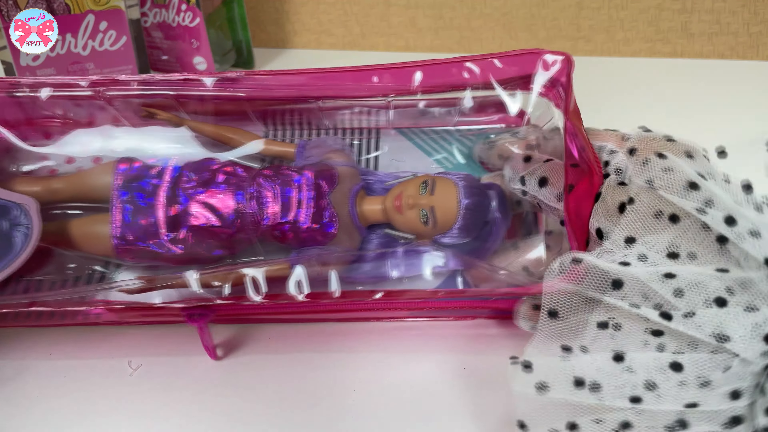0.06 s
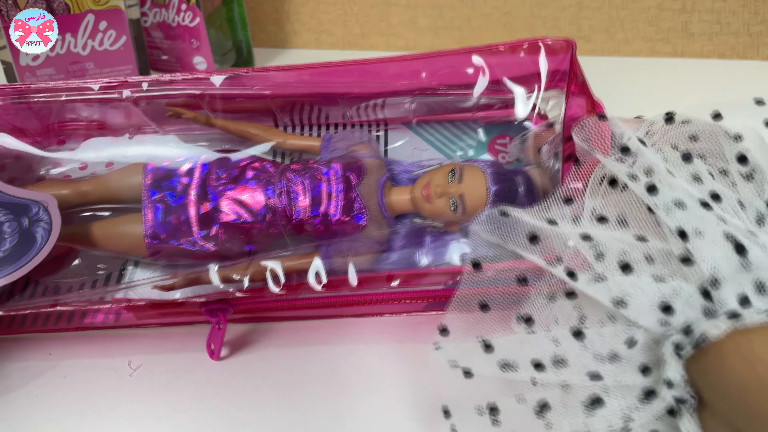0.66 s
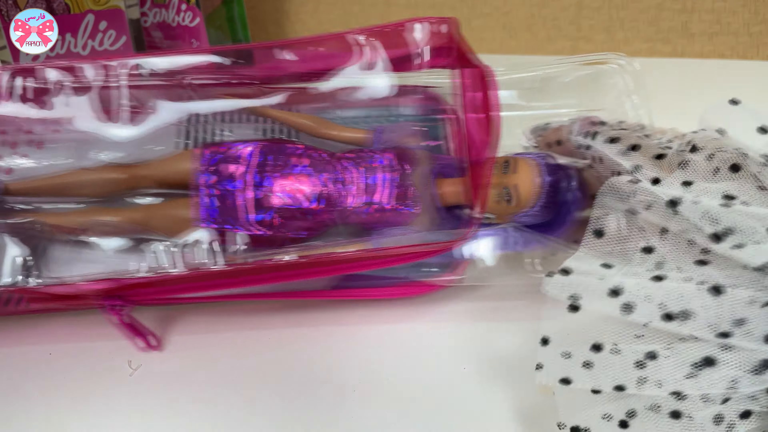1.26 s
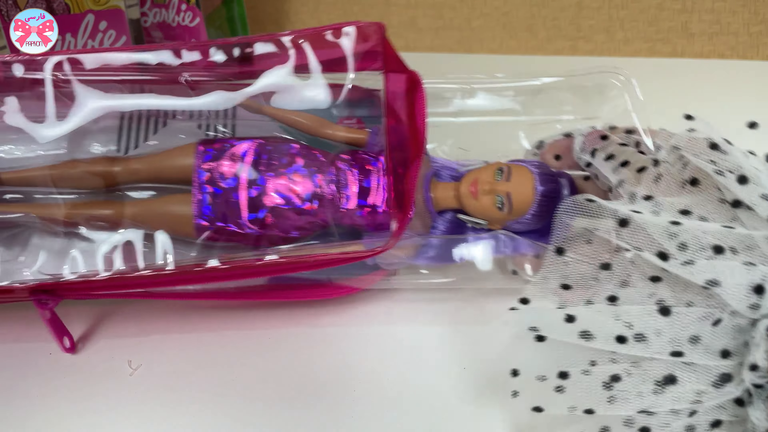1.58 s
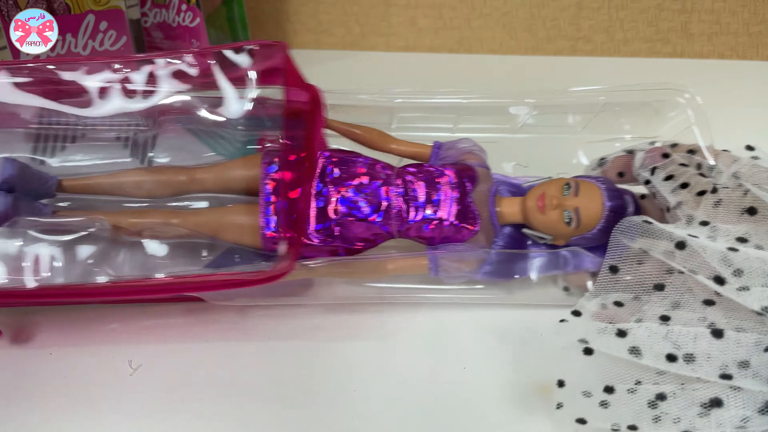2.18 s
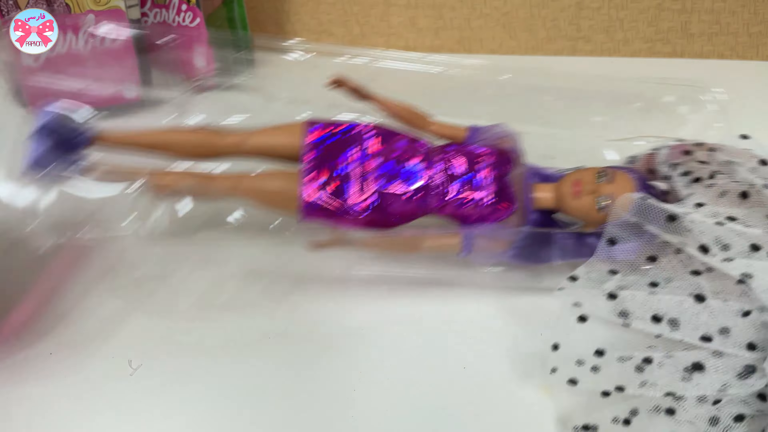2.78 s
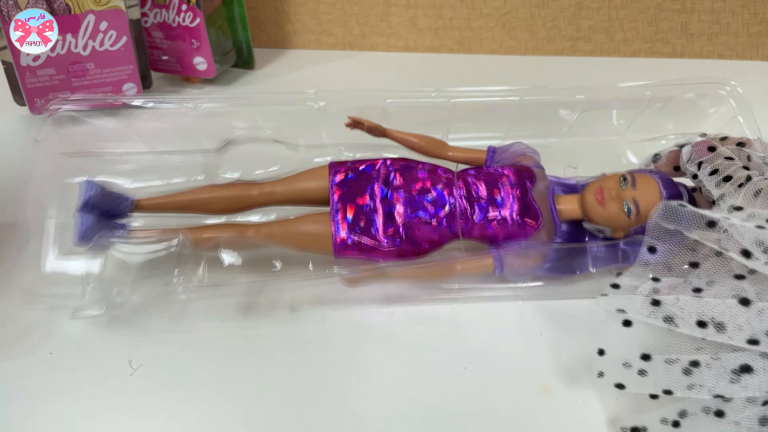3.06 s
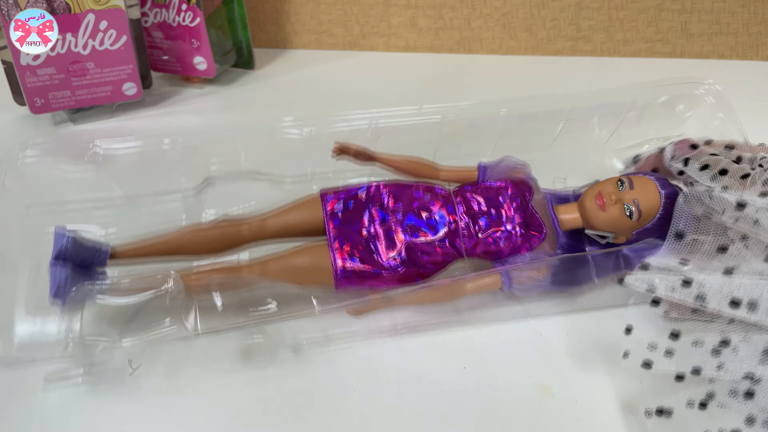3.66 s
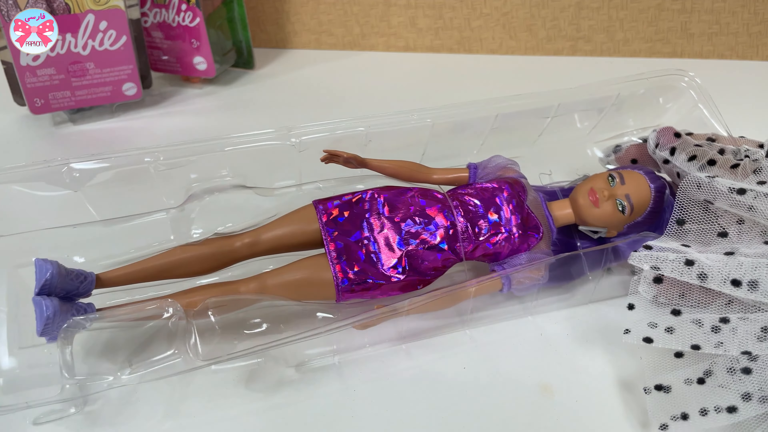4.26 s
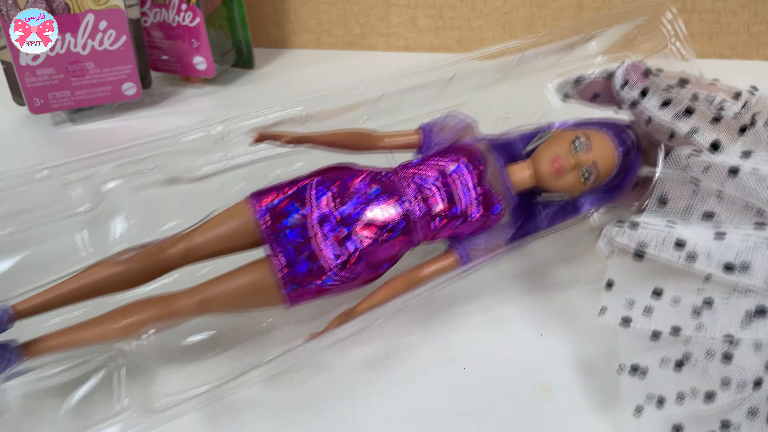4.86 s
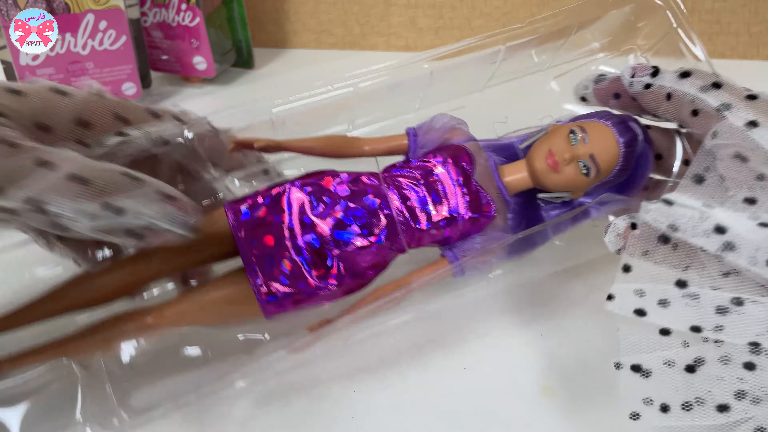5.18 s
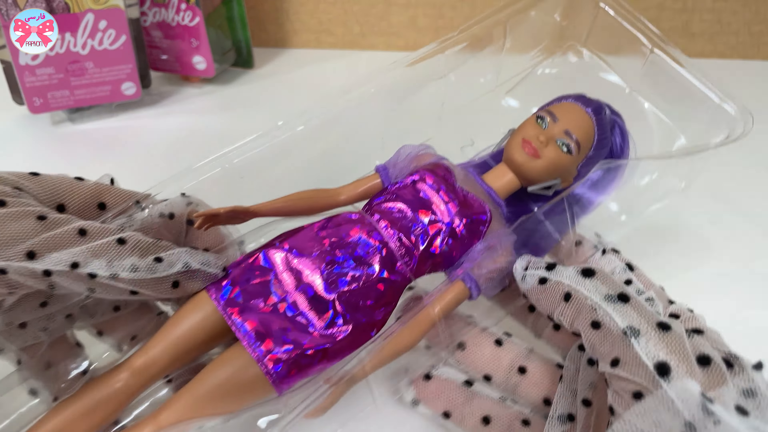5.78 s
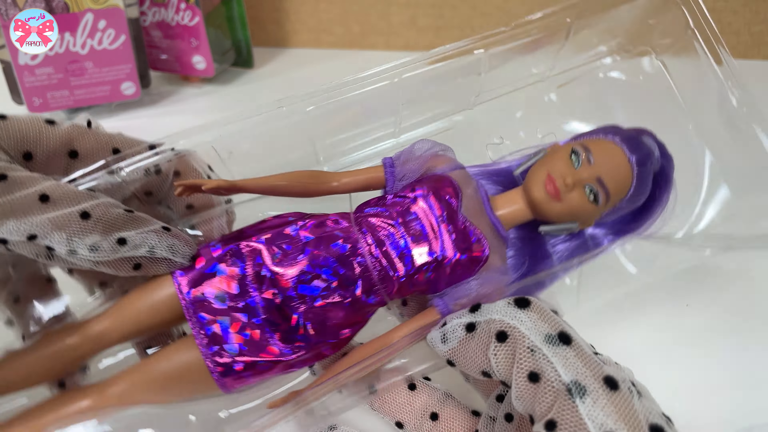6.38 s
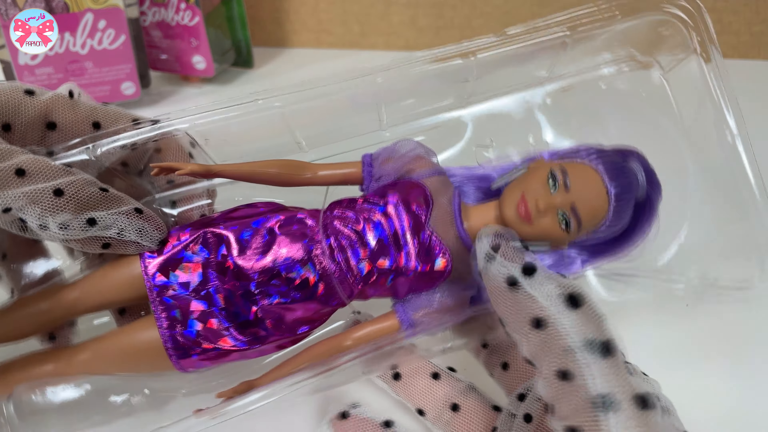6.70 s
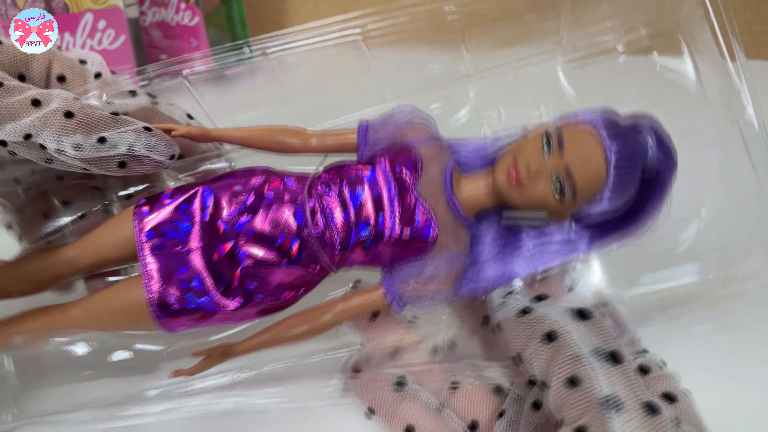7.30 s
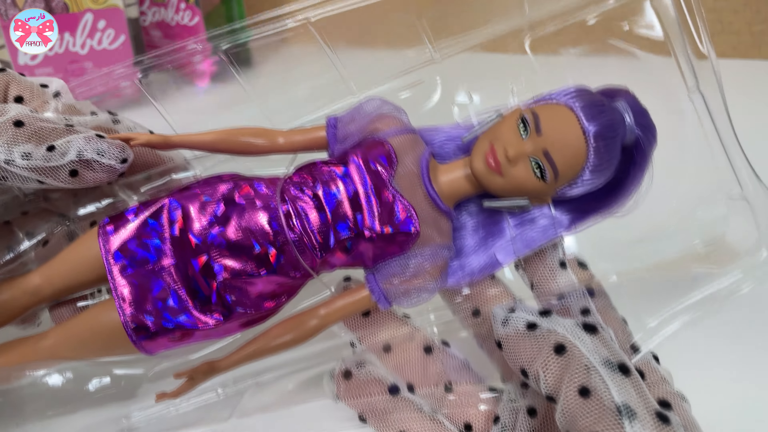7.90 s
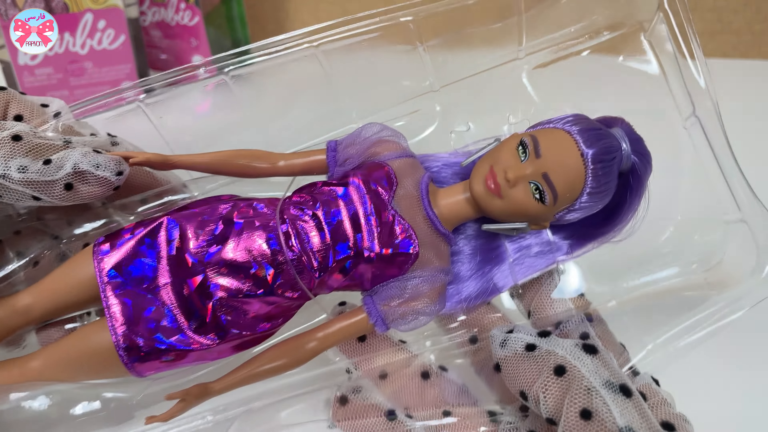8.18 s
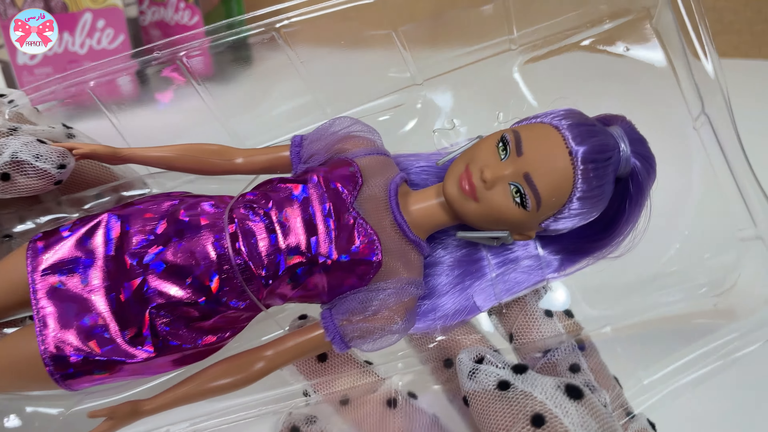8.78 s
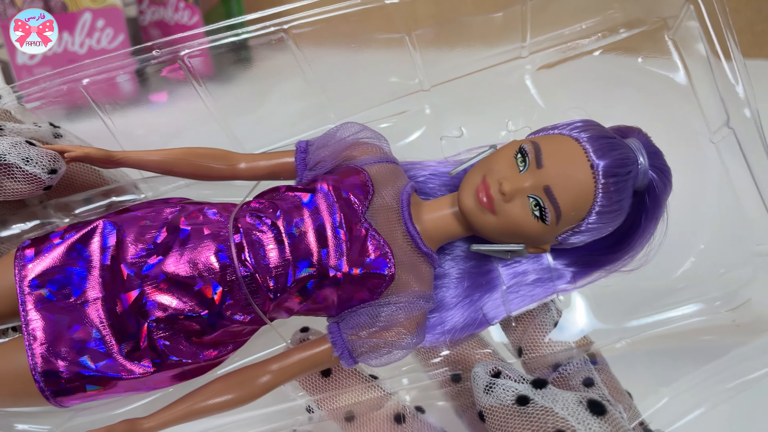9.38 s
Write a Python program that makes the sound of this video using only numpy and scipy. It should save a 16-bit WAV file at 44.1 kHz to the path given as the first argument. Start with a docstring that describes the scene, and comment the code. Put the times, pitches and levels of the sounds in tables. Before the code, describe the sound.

A thin plastic tray is tugged from a vinyl pouch and flexed, with close scrapes, crinkles, sharp snaps and a few dull table thumps.

```python
"""At a table in a small room, close by: a thin moulded plastic tray is tugged out of a vinyl pouch,
set down, turned and flexed open. Vinyl, table top and mesh sleeves scrape over it in tiny slips.
The sheet buckles in sharp snaps whose bending waves chirp downward and bounce between its edges.
Hard blows thump the table. The room answers over a low hum and rumble."""
import sys
import numpy as np
from scipy import signal
from scipy.fft import rfft, irfft, next_fast_len
from scipy.io import wavfile
from scipy.ndimage import uniform_filter1d, map_coordinates

SR = 44100
rng = np.random.default_rng(int(sys.argv[2]) if len(sys.argv) > 2 else 0)


def master(y):
    """Save y as 16-bit WAV."""
    cut = np.clip(np.atleast_2d(y).T, -1, 1)
    pcm = np.round(cut * 32767)  # scale
    wavfile.write(sys.argv[1], SR, pcm.astype(np.int16))


N = 420713
RING = 8192  # samples per impulse response
RING_HZ = np.fft.rfftfreq(RING, 1 / SR)
SNAP_SAMPLES = .01 * SR  # snap and tick levels are rms over this span

# room noise spectrum: f/Hz, relative level/dB
AIR_SPECTRUM = [(25, -45.5), (43, -27.5), (62, -5), (80, -7.5), (110, -7.5), (150, -20.5), (270, -13),
                (600, -29), (1100, -25.5), (1600, -36), (2300, -25.5), (3600, -32.5), (4500, -26.5),
                (6500, -46.5), (16000, -59)]
# rumble envelope: t/s, level/dB
RUMBLE_LEVELS = [(0, -58.5), (1.6, -60), (3.9, -59.5), (5.4, -64), (8.2, -61.5), (8.7, -70.5), (9.5, -57)]
# hum partials: f/Hz, level/dB
HUM_PARTIALS = [(62, -68), (120, -67)]
# pouch drags over tray: t/s, attack/s, hold/s, rub level before trim/dB, drumming re rub/dB,
# hiss re rub/dB, low note/Hz, high note/Hz
POUCH_STROKES = [(0.0, 0.01, 0.2, -47, -5, -6.0, 436, 1610.0),
                 (0.228, 0.015, 0.14, -50.5, -4.5, -1.5, 267, 1370.0),
                 (0.367, 0.14, 0.16, -49, -0.5, -11.5, 398, 1390.0),
                 (0.652, 0.22, 0.12, -39, -7.5, -15.5, 465, 1510.0),
                 (0.916, 0.082, 0.064, -28, -7, 0.0, 954, 5690.0),
                 (1.102, 0.02, 0.105, -49.5, -3, -8.0, 265.0, 1250.0),
                 (1.212, 0.11, 0.18, -52.0, -12.5, -24, 465, 1610.0),
                 (1.558, 0.034, 0.088, -30.5, -12.0, -7, 243, 1096),
                 (1.907, 0.017, 0.1, -34.0, -11, -1.5, 1020, 2810.0),
                 (2.041, 0.033, 0.046, -45.0, -16.5, -7.0, 200.0, 1370.0),
                 (2.204, 0.046, 0.071, -40.5, 1, 0.5, 450.0, 5750.0),
                 (2.3, 0.099, 0.1, -29.5, -16, 0.5, 686.0, 4610.0),
                 (2.495, 0.012, 0.11, -39.5, -6.0, 1.5, 700, 3980.0),
                 (2.674, 0.11, 0.02, -46, 3.5, 11.5, 470, 3820.0),
                 (2.749, 0.087, 0.014, -22.5, -13.5, 1.5, 710, 2150.0)]
# tray slides on table and under sleeves: columns as POUCH_STROKES
SLIDE_STROKES = [(3.114, 0.019, 0.0088, -37.5, 4, -8.5, 453, 1600),
                 (3.227, 0.137, 0.045, -49.5, 1.5, -7, 244, 1560),
                 (3.638, 0.057, 0.042, -38, 9, -8, 186.0, 452.0),
                 (3.774, 0.029, 0.032, -52.5, 11, -2.5, 186.0, 460.0),
                 (4.074, 0.01, 0.16, -59.5, -4.5, -8, 914, 4540),
                 (4.249, 0.027, 0.051, -48.5, -11, 0.0, 730, 3300.0),
                 (4.39, 0.076, 0.051, -56.5, 1, -3, 754.0, 2480.0),
                 (4.661, 0.07, 0.4, -67, -0.5, 7, 480, 8500),
                 (5.218, 0.067, 0.11, -30, -10, -1.5, 1620.0, 3300.0),
                 (5.393, 0.011, 0.25, -49.5, -9, -0.5, 1360, 3400),
                 (5.681, 0.14, 0.15, -56, 1, 5.5, 361, 1950),
                 (6.065, 0.099, 0.2, -47.5, -4.5, -1.0, 343, 3900.0),
                 (6.273, 0.18, 0.13, -34, -9, -11, 567.0, 1080.0),
                 (6.624, 0.12, 0.15, -49.0, 4, -4.0, 260.0, 944.0),
                 (6.896, 0.052, 0.19, -51.5, 0, 0.5, 490, 3900)]
# fingers shift, grip too tight to sing: columns as POUCH_STROKES, without notes
GRIP_STROKES = [(7.136, 0.017, 0.025, -51, -11, -7), (7.318, 0.048, 0.51, -59.5, 1.5, -1.5),
                (8.052, 0.07, 0.074, -62.5, -6.5, 0), (8.83, 0.13, 0.24, -69, -2, 6.5)]
# tray panel resonances: f/Hz, width/Hz, gain/dB
PANEL_MODES = [(155, 63, -4.5), (450, 40, 0.5), (727, 50, -0.5), (1070, 310, 1), (1420, 120, 0.5),
               (2150, 210, 0.5), (3160, 960, -2), (4300, 160, -1)]
# source spectra: f/Hz, relative level/dB
POUCH_SPECTRUM = [(41, -50), (70, -17.5), (385, -9.5), (620, -7.5), (744, -3.5), (815, -2), (977, -4),
                  (1850, -10), (2780, -8.5), (4190, -14), (5620, -14.5), (6750, -16.5), (12200, -26),
                  (16000, -34.5)]
TRAY_SPECTRUM = [(41, -27.5), (70, -14), (186, 0.5), (483, -5.5), (566, -6.5), (797, -4), (1100, -5),
                 (1370, -7.5), (1610, -7), (1980, -13.5), (2220, -12), (2780, -14.5), (7220, -24),
                 (16000, -41.5)]
SNAP_SPECTRUM = [(40, -35), (110, -13.5), (280, -6), (600, 2.5), (1100, 5.5), (1900, 2), (3200, 2.5),
                 (5500, -2.5), (8000, -8.5), (10500, -14), (13000, -22), (16000, -22)]
TICK_SPECTRUM = [(300, -20.5), (1200, -4), (4000, 4.5), (9000, -9), (16000, -14.5)]
RUMBLE_SPECTRUM = [(35, -38), (60, 2.5), (120, -1.5), (300, -15), (700, -47), (2000, -100)]
# room decay: f/Hz, t60/s
ROOM_T60 = [(150, 0.15), (1000, 0.25), (4000, 0.22), (9000, 0.23), (15000, 0.085)]
# buckles and knocks; soft knocks dark, small creases bright, broad panels focused in the middle:
# t/s, level before trim/dB, tilt/(dB/oct), focus/(dB/oct^2), crease run/s, panel note/Hz
BUCKLES = [(0.0649, -29.5, -1.5, -0.4, 0.0023, 1100), (0.107, -20.5, -8.5, 0.5, 0.0048, 836),
           (0.186, -39, -7, 3, 0.0028, 1220.0), (0.2046, -28.5, -2, 1, 0.0052, 1280),
           (0.2853, -11, -5.5, 1.5, 0.0018, 826), (0.367, -39, -1, 2.5, 0.008, 2800),
           (0.3757, -27.0, -0.5, -0.7, 0.00042, 2740), (0.6043, -20, -7.5, -1.1, 0.001, 814),
           (0.61, -24, -9, 4.5, 0.0041, 1066), (0.715, -39.5, -6.5, -0.7, 0.0065, 506.0),
           (0.853, -31.5, -16, 3.3, 0.0076, 499), (0.9324, -9.0, -0.5, 0.2, 0.0054, 1060.0),
           (0.978, -21.5, -3, -1.7, 0.0009, 1180.0), (0.983, -17, -5, -1.3, 0.0055, 1003),
           (1.0216, -19.5, 0, -1, 0.0011, 5840), (1.071, -23, -1.9, -1.5, 0.00063, 1040),
           (1.211, -26, -14, 1.5, 0.0059, 470), (1.528, -32.5, -11.5, 0.7, 0.0078, 474.0),
           (1.5784, -24.5, 0.5, -0.6, 0.0014, 1200), (1.613, -29, -0.5, 0.8, 0.0073, 1100),
           (1.727, -32.5, -8.5, -1.3, 0.0078, 710), (1.894, -29, -5.5, 2, 0.0051, 795),
           (1.98, -24.5, -7.5, 4, 0.0024, 1000), (2.1231, -27, -1.5, -1.8, 0.00047, 5100),
           (2.226, -30.5, -1.2, -1.8, 0.0011, 4200), (2.2821, -23, -2, -0.9, 0.0011, 5800.0),
           (2.3069, -27.0, -2, -2, 0.00054, 4260.0), (2.395, -18.5, -0.7, -0.2, 0.0038, 4130.0),
           (2.4297, -14, 4, 0.8, 0.0046, 4560), (2.444, -16.5, -1.7, -0.8, 0.0062, 723),
           (2.561, -25, -2.5, -1, 0.0098, 656), (2.576, -29, 4, 1, 0.0018, 3710),
           (2.592, -18.5, -0.9, -0.9, 0.0015, 2960), (2.62, -38, 6, -1, 0.00075, 2830),
           (2.674, -38.5, -0.5, -2, 0.0032, 1210.0), (2.771, -14.0, 3, -0.5, 0.00072, 2670),
           (2.8209, -15.5, 2.2, 1, 0.0055, 3400), (2.85, -15.5, 2, 4.5, 0.00063, 2150.0),
           (3.1241, -20, -2.6, 0, 0.0026, 1460), (3.131, -21, -7.5, -1.9, 0.003, 503),
           (3.265, -36.5, -4, -0.1, 0.0027, 480), (3.647, -31, -7.5, -0.2, 0.0045, 450.0),
           (3.687, -27.5, -6.1, -1.5, 0.00097, 452.0), (3.708, -22, -5, -2.5, 0.0066, 445),
           (3.755, -35, -9, -0.5, 0.0082, 250), (3.828, -36, -8.5, -0.5, 0.0032, 452.0),
           (4.25, -44.5, -5, -0.3, 0.0061, 900), (4.468, -45.5, -10.5, -0.8, 0.0043, 775.0),
           (4.542, -41, -5.5, 4, 0.0037, 746), (4.7341, -45.5, -1.2, -1, 0.00078, 2230.0),
           (4.747, -46, 1.5, -0.2, 0.00076, 2500), (4.9709, -54.5, 0.5, -2, 0.00058, 6730.0),
           (5.2062, -40, 10, 0.8, 0.0084, 6400.0), (5.4438, -11.5, -2.5, 0.03, 0.0042, 1440),
           (5.589, -37.5, -7, -1, 0.0033, 1120), (5.686, -43.5, 7, 2, 0.0014, 3880.0),
           (5.8917, -42.5, 3.5, 0.2, 0.003, 1230), (5.922, -36.5, -0.7, 0.0, 0.0029, 4300.0),
           (6.53, -37.5, 9, 2.5, 0.002, 1080), (6.6373, -30.5, 4, 0.7, 0.00044, 4220.0),
           (6.6946, -38.0, -1, -2.7, 0.0011, 689.0), (6.7699, -41, 3.5, 1, 0.0018, 920),
           (7.036, -39, 1, -2.1, 0.0023, 947.0), (7.1847, -19.5, -5.5, 1.5, 0.00019, 830),
           (7.2453, -17, -4, 1, 0.0021, 890), (7.4016, -8.5, -0.5, -0.5, 0.0017, 1314),
           (7.4851, -18.5, 3, 0.5, 0.00086, 2800.0), (7.537, -31.5, -10.0, 1, 0.0016, 902),
           (7.5662, -21, 0.5, -2.74, 0.00045, 9880), (7.6152, -43.5, 10.0, 3.5, 0.00017, 5680.0),
           (7.6694, -10.5, 2.8, 3.5, 0.0018, 874), (7.83, -16, 2.5, -0.24, 0.001, 1110),
           (7.847, -26, -8, 0.7, 0.0053, 357), (8.154, -49, 6.5, 2.5, 0.001, 1160.0),
           (8.171, -46.5, 1, -0.5, 0.0032, 1170.0), (8.243, -40.5, -1.4, 0.2, 0.0015, 2910.0),
           (8.44, -64, 1, 0, 0.0005, 4200), (8.8279, -51.5, 0.5, -1.7, 0.0002, 2990),
           (8.8749, -38.0, -1.2, -0.8, 0.0043, 1030), (8.9187, -45.5, -1.5, -1.5, 0.0038, 1230),
           (8.996, -44, 0.6, 0.5, 0.001, 3910.0), (9.0142, -34, -0.5, 0, 0.00232, 2920),
           (9.0398, -44.0, 10, 2.7, 0.00066, 2530), (9.0878, -53, 10, 1.5, 0.00046, 3900),
           (9.1794, -41.5, 1.3, 0, 0.001, 4210.0), (9.2671, -42.5, 1.5, 0, 0.00083, 3860),
           (9.283, -48.5, 0, -1, 0.001, 2950), (9.305, -50.5, 0.5, -0.1, 0.0023, 6500)]
# hard blows through tray into table: t/s, level/dB
TABLE_BLOWS = [(0.986, -41), (2.441, -33), (3.131, -29), (3.721, -23.5), (5.448, -42), (7.405, -27.5),
               (7.849, -40)]
# table top modes: f/Hz, gain/dB, t60/s
TABLE_MODES = [(74, -7.5, 0.079), (110, 0.5, .08), (144, 1.5, .09), (229, -2, 0.092)]


def amp(db):
    """dB to gain."""
    return 10 ** (np.asarray(db) / 20)


def unit(x):
    """Scale to rms 1."""
    return x / np.sqrt(np.mean(x ** 2) + 1e-20)


def along(points, hz):
    """Interpolate (f/Hz, value) points on a log axis."""
    f, v = np.transpose(points)
    return np.interp(np.log(hz + 1), np.log(f + 1), v)


def wobble(knots_per_s, size):
    """Smooth random curve."""
    at = np.arange(size) * knots_per_s / SR
    coarse = at[::64]
    return np.interp(at, coarse, map_coordinates(rng.standard_normal(int(at[-1]) + 4), [coarse]))


def filtered(x, response):
    """Apply response(f/Hz) to x."""
    m = next_fast_len(x.shape[-1] + RING)
    return irfft(rfft(x, m) * response(np.fft.rfftfreq(m, 1 / SR)), m)[..., :x.shape[-1]]


def bands(hz, edges_hz):
    """Soft adjacent pass bands summing to one."""
    below = [1 / (1 + (hz / edge) ** 6) for edge in edges_hz]
    return np.diff([0 * hz] + below + [1 + 0 * hz], axis=0)


def causal(gain):
    """Minimum-phase response with this gain."""
    cepstrum = irfft(np.log(np.maximum(gain, 1e-6)))
    half = cepstrum.shape[-1] // 2
    cepstrum[..., 1:half] *= 2
    cepstrum[..., half + 1:] = 0
    return np.exp(rfft(cepstrum))


def resonance(hz, centre_hz, q):
    """One mode, gain 1 at centre."""
    damping = 1j * hz * centre_hz / q
    return damping / (centre_hz ** 2 - hz ** 2 + damping)


def background():
    """Room rumble and wavering hum under faint hiss."""
    t = np.arange(N) / SR
    air = unit(filtered(rng.standard_normal(N), lambda hz: amp(along(AIR_SPECTRUM, hz))))
    rumble = unit(filtered(rng.standard_normal(N), lambda hz: amp(along(RUMBLE_SPECTRUM, hz))))
    hum = np.zeros(N)
    for hz, db in HUM_PARTIALS:
        peak = np.sqrt(2) * amp(db + 2.7 * wobble(42, N))
        hum += peak * np.sin(2 * np.pi * hz * t + 0.73 * wobble(18, N))
    rumble_db = np.interp(t, *np.transpose(RUMBLE_LEVELS)) + 2.5 * wobble(2.8, N)
    return amp(-65) * air + amp(rumble_db) * rumble + hum


def pressure(span_s, strokes, rest_db, release_db_per_s):
    """Strokes swell, hold and release over resting contact. Rows: t/s, drumming/dB, rub/dB, hiss/dB."""
    t = np.arange(*span_s, .002)
    swell_db = 18.5
    power = np.outer(amp(rest_db) ** 2, np.ones_like(t))
    for start_s, attack_s, hold_s, db, drumming_db, hiss_db, *_ in strokes:
        attack_left = np.maximum(1 - (t - start_s) / attack_s, 0)
        released_s = np.maximum(t - start_s - attack_s - hold_s, 0)
        envelope = amp(db - swell_db * attack_left - release_db_per_s * released_s)
        power += np.outer(amp([drumming_db, 0, hiss_db]), envelope) ** 2
    return np.column_stack([t, *(10 * np.log10(power))])


def bending_waves(direct_s, detour_max_s, echo_db, t60_s, paths=14):
    """Spectrum of direct wave plus edge echoes. Delays hold at 1 kHz and grow toward the bass."""
    slowness = np.sqrt(1000 / np.maximum(RING_HZ, 1))
    detour_s = detour_max_s * (np.arange(paths) + rng.random(paths)) / paths
    gain = amp(echo_db) * rng.choice([-1, 1], paths)
    detour_s[0], gain[0] = 0, 1
    phase_delay_s = 2 * (direct_s + detour_s)[:, None] * slowness  # twice the group delay
    loss = amp(-60 * detour_s / t60_s)
    return (gain * loss) @ np.exp(-2j * np.pi * RING_HZ * phase_delay_s)


def panels(hz):
    """Gain of the tray's panel resonances."""
    return amp(sum(db / (1 + (2 * (hz - centre) / width) ** 2) for centre, width, db in PANEL_MODES))


def span_notes(rubbing, t, strokes):
    """During a stroke the free span of sheet sings a low and a high note."""
    out = rubbing.copy()
    for start_s, attack_s, hold_s, _, _, _, *notes_hz in strokes:
        end_s = start_s + attack_s + hold_s
        gate = np.clip(np.minimum(t - start_s, end_s - t) / .02 + .5, 0, 1)
        near = (t > start_s - .02) & (t < end_s + .05)
        for note_hz, lift_db in zip(notes_hz, (8, 5)):
            note = filtered((rubbing * gate)[near], lambda hz: resonance(hz, note_hz, q=10))
            out[near] += (amp(lift_db) - 1) * note
    return out


def scrape(contact, strokes, spectrum, slips_per_s, spread_db, judder_db, trim_db, spots=6):
    """Tiny uneven slips ring the sheet; the contact wanders between a few spots."""
    times_s, *levels_db = np.transpose(contact)
    first, last = int(times_s[0] * SR), min(int(times_s[-1] * SR), N)
    size = last - first
    t = np.arange(first, last) / SR
    judder = amp(judder_db * wobble(70, size))
    ringing = np.zeros(size)
    for _ in range(spots):
        slips = rng.random(size) < slips_per_s / spots / SR
        force = amp(spread_db * np.minimum(rng.standard_normal(size), 2.6)) * rng.choice([-1, 1], size)
        waves = bending_waves(direct_s=0.001157, detour_max_s=.024, echo_db=-5, t60_s=0.073)
        response = unit(irfft(waves)[:RING // 2])
        wander = amp(3.6 * wobble(6, size))
        ringing += signal.fftconvolve(slips * force * judder * wander, response)[:size]
    parts = filtered(span_notes(ringing, t, strokes),  # drumming, rub, hiss
                     lambda hz: amp(along(spectrum, hz)) * panels(hz) * bands(hz, [500, 2000]))
    out = np.zeros(N)
    for part, db in zip(parts, levels_db):
        running_rms = np.sqrt(np.abs(uniform_filter1d(part ** 2, size=SR // 14)) + 1e-12)
        out[first:last] += part / running_rms * amp(np.interp(t, times_s, db) + trim_db)
    return out


def catches(contact, per_s, spread_db, offset_db):
    """An edge or thread catches and lets go with a fine tick, louder under a harder rub."""
    times_s, _, _, hiss_db = np.transpose(contact)
    length_s = times_s[-1] - times_s[0]
    colour = causal(amp(along(TICK_SPECTRUM, RING_HZ)))
    out = np.zeros(N + RING)
    for when, strength in rng.random((int(per_s * length_s), 2)):
        at_s = times_s[0] + when * length_s
        waves = bending_waves(direct_s=.001, detour_max_s=0.0075, echo_db=-9, t60_s=.03, paths=5)
        tick = irfft(colour * waves)
        db = min(np.interp(at_s, times_s, hiss_db), -45) + offset_db + spread_db * strength ** 2
        out[int(at_s * SR):][:RING] += np.sqrt(SNAP_SAMPLES) * amp(db) * tick / np.linalg.norm(tick)
    return out[:N]


def room(x, tails=3, dwell_s=.35, onset_s=0.0036):
    """Short diffuse tails take turns as the hands move about."""
    out = np.zeros(N)
    active = (np.arange(N) / SR / dwell_s).astype(int) % tails
    for k in range(tails):
        hz, t, noise = signal.stft(rng.standard_normal(SR // 2), SR, nperseg=256)
        decay = amp(-60 * t / along(ROOM_T60, hz)[:, None])
        tail = signal.istft(noise * decay, SR, nperseg=256)[1]
        tail *= 1 - np.exp(-(np.arange(len(tail)) / SR / onset_s) ** 2)
        share = uniform_filter1d((active == k) * 1., size=512)
        out += signal.fftconvolve(x * np.sqrt(np.abs(share)), tail / np.linalg.norm(tail))[:N]
    return out


def crease(run_s, later_db=-5, jumps=9):
    """Spectrum of a crease running through the sheet in quick jumps."""
    at_s = run_s * (np.arange(jumps) + rng.random(jumps)) / jumps
    gain = amp(later_db) * rng.standard_normal(jumps)
    at_s[0], gain[0] = 0, 1
    return gain @ np.exp(-2j * np.pi * RING_HZ * at_s[:, None])


def snaps():
    """Each buckle has its own echoes, panel note and tilt. Returns direct sound and room feed."""
    hz = RING_HZ
    lead = RING // 32  # samples for the band filters' pre-ring
    tone = amp(along(SNAP_SPECTRUM, hz)) * panels(hz)
    split = bands(hz, [550, 1800, 6000]) * np.exp(-2j * np.pi * hz * lead / SR)
    trim_db = np.array([-0.3, -1.6, -0.4, -1.4])  # thud, body, crack, tick
    octaves = np.log2(np.clip(hz, 250, 11000) / 1500)
    out = np.zeros((2, N + 2 * RING))
    for at_s, db, tilt_db, focus_db, run_s, panel_hz in BUCKLES:
        slant = amp(tilt_db * octaves - focus_db * octaves ** 2)
        note = 1 + amp(4) * resonance(hz, panel_hz, q=panel_hz / (90 + panel_hz / 12))
        colour = causal(tone * slant / slant.max()) * note * split
        shares = np.linalg.norm(colour, axis=1) / np.linalg.norm(colour)
        direct = crease(run_s)
        direct *= bending_waves(direct_s=0.001845, detour_max_s=.024, echo_db=-1.5, t60_s=0.041)
        # echo notches even out over all directions: the room gets only the shell's ring
        shell = 1 + amp(-0.5) * sum(resonance(hz, panel_hz * ratio, q=20) for ratio in (0.94, 1.7, 2.6))
        parts = irfft(np.array([direct, shell])[:, None] * colour)
        parts /= np.linalg.norm(parts, axis=-1, keepdims=True)
        start = round((at_s - .0002) * SR)
        out[:, start:start + RING] += np.sqrt(SNAP_SAMPLES) * (amp(db + trim_db) * shares) @ parts
    return out[:, lead:lead + N]


def thumps(onset_s=0.0024):
    """The table top answers hard blows with a few dull modes."""
    t = np.arange(RING) / SR
    ring = sum((-1) ** k * amp(db - 60 * t / t60_s) * np.sin(2 * np.pi * hz * t)
               for k, (hz, db, t60_s) in enumerate(TABLE_MODES))
    ring *= 1 - np.exp(-t / onset_s)
    out = np.zeros(N + RING)
    for at_s, db in TABLE_BLOWS:
        out[round(at_s * SR):][:RING] += amp(db) * ring
    return out[:N]


def scene():
    """Tug, slide, grip: scrapes, snaps and thumps in the room. Mono."""
    cracks, radiated = snaps()
    tug = pressure((0, 3.05), POUCH_STROKES, rest_db=(-59, -56.5, -61), release_db_per_s=530)
    slide = pressure((3.05, 7.18), SLIDE_STROKES, rest_db=(-65.5, -66, -65.5), release_db_per_s=150)
    grip = pressure((7.18, 9.54), GRIP_STROKES, rest_db=(-71.5, -83.5, -83), release_db_per_s=81)
    rubs = scrape(tug, POUCH_STROKES, POUCH_SPECTRUM,
                  slips_per_s=2600, spread_db=4, judder_db=3, trim_db=-0.42)
    rubs += scrape(slide, SLIDE_STROKES, TRAY_SPECTRUM,
                   slips_per_s=5000, spread_db=4.5, judder_db=2, trim_db=-1.8)
    rubs += scrape(grip, GRIP_STROKES, TRAY_SPECTRUM,
                   slips_per_s=560, spread_db=2.5, judder_db=5, trim_db=0)
    rubs += catches(tug, per_s=32, spread_db=10.5, offset_db=-6.5)
    rubs += catches(slide, per_s=50, spread_db=9, offset_db=-9)
    rubs += catches(grip, per_s=30, spread_db=9.5, offset_db=-5.5)
    reverb = room(amp(-14.5) * radiated + amp(-15) * rubs)
    return (cracks + rubs + thumps() + reverb + background())[None]


def record(dry):
    """Microphone: bass cut, soft clip on the loudest snaps, band limit."""
    low_hz, top_hz, ceiling = 44, 16100, .95
    lean = signal.sosfilt(signal.butter(4, low_hz, "highpass", fs=SR, output="sos"), dry)
    rounded = lean / (1 + np.abs(lean / ceiling) ** 6) ** (1 / 6)
    return filtered(rounded, lambda hz: 1 / (1 + (hz / top_hz) ** 120))


dry = scene()
out = record(dry)
master(out)
```